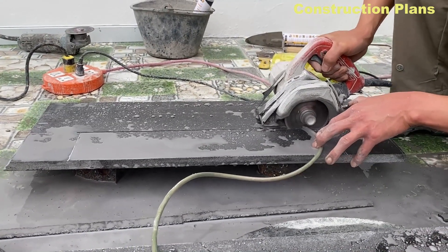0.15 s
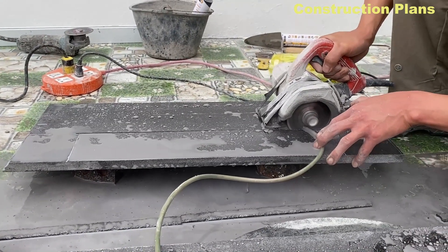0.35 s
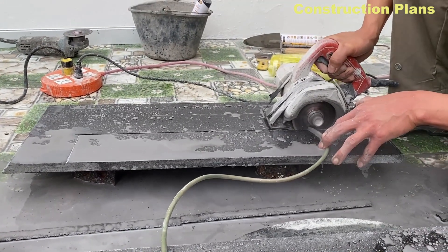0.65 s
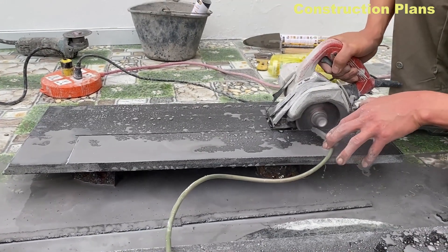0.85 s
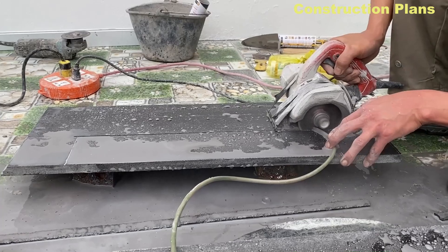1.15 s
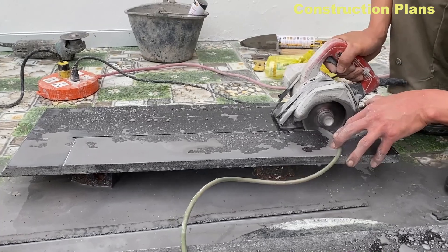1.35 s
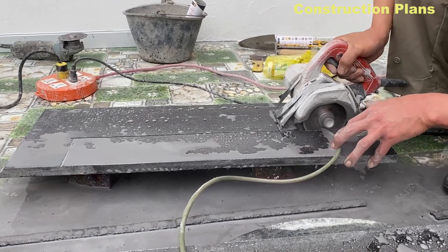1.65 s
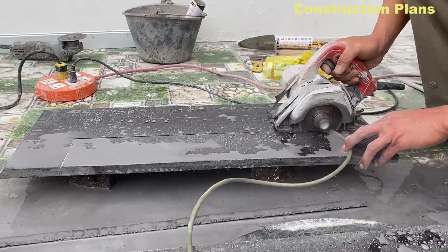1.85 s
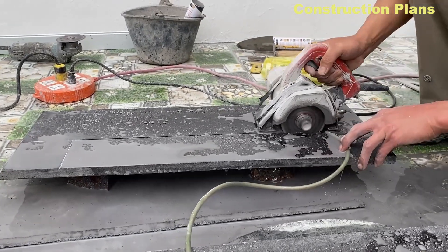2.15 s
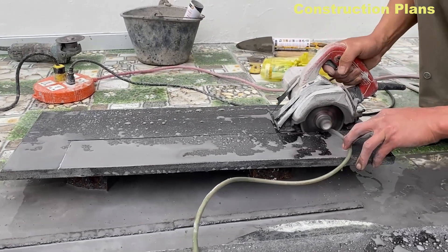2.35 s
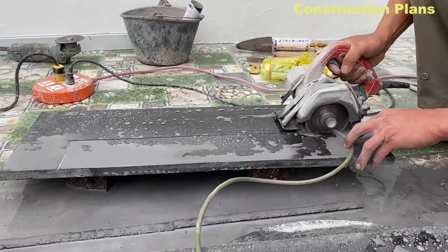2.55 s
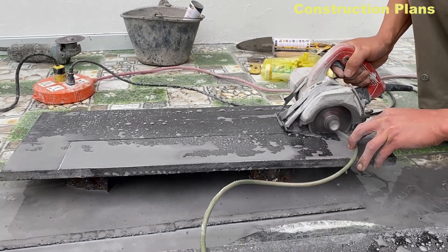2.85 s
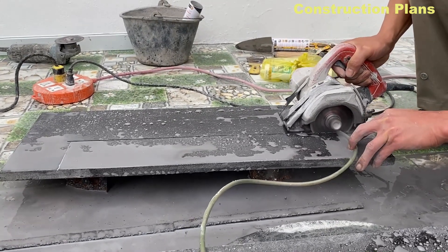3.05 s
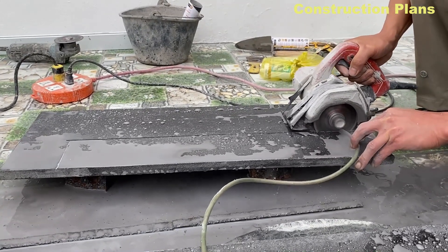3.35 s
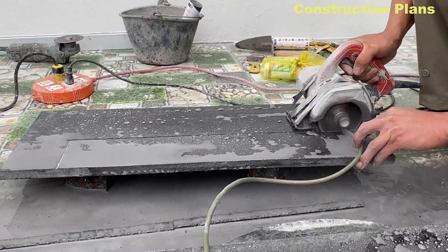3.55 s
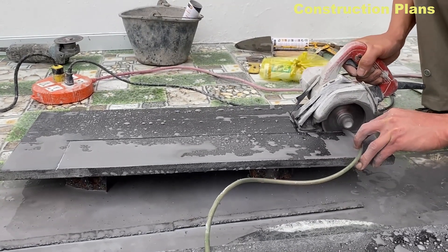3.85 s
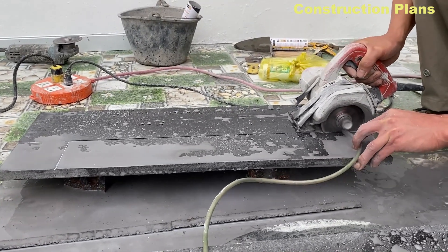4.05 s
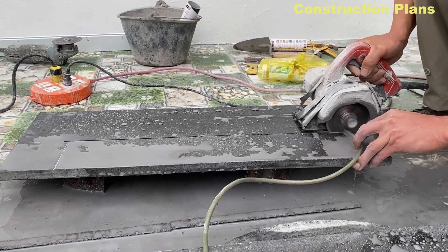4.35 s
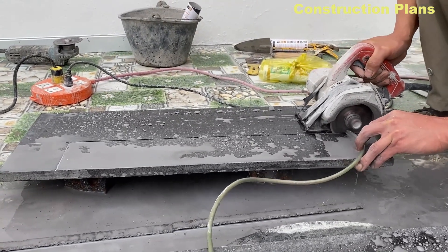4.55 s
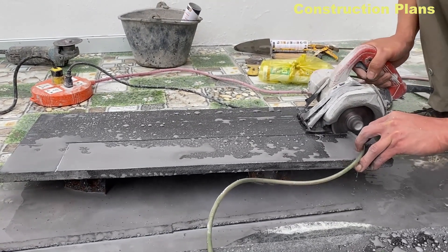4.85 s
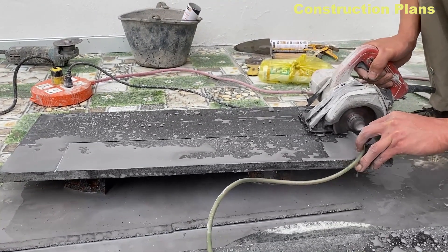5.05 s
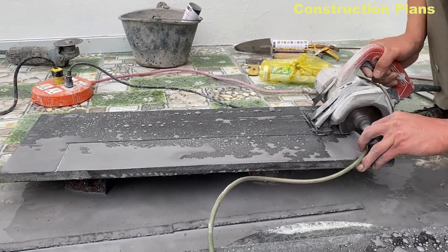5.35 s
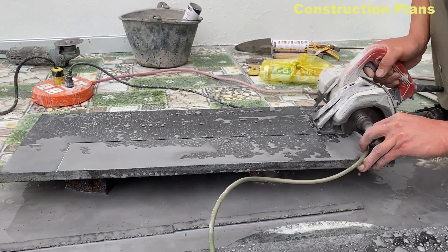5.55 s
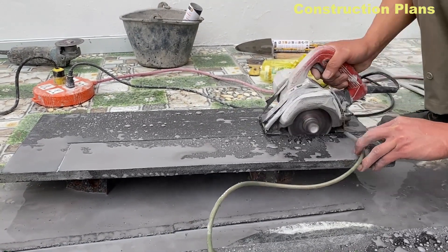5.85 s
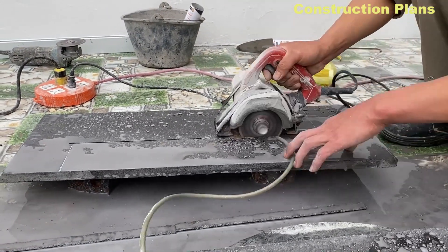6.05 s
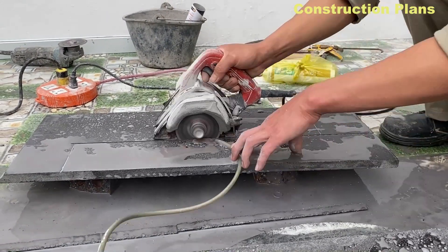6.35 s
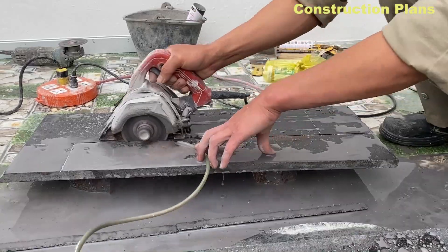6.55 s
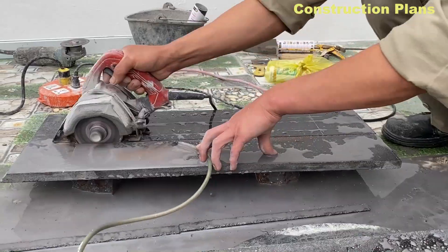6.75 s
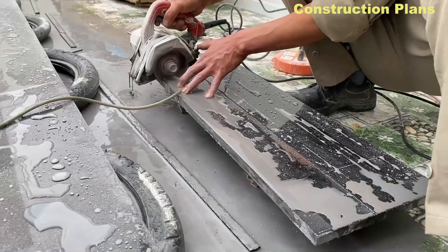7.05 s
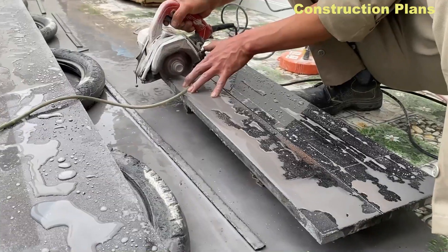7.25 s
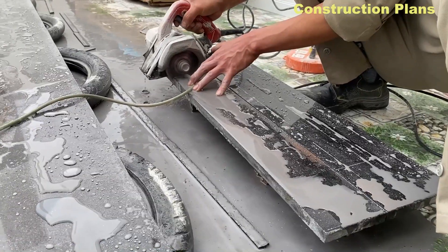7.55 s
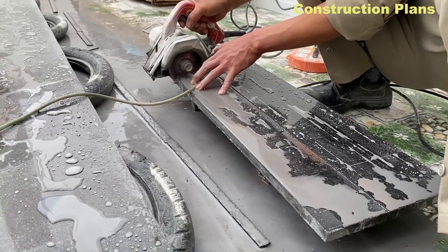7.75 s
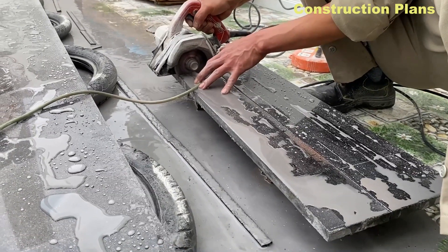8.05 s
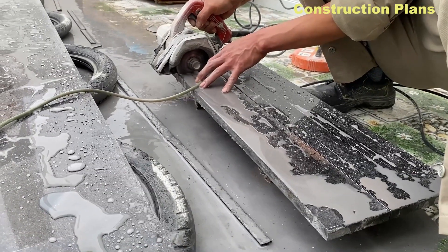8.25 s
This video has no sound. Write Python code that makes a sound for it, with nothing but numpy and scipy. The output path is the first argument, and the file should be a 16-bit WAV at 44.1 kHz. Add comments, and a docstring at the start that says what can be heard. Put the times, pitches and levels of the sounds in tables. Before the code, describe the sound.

A handheld water-fed saw grinds a stone slab very close to a stereo microphone, with little sense of room. From 0 to 2 s there is only a steady, bright, gritty hiss mixed with fine spray, its broad metallic tints wandering. At about 2 s the colour shifts and faint fan draught starts to flutter; from 3 s to 4.5 s it becomes strong, low, ragged puffs, thudding on both sides and brighter on the left. Puffs thin out from 4.5 s, with a heavier one near 4.9 s, while the grind eases to its softest around 5.6 s. At 5.8 s it bites harder and gusts return, strongest from 6.3 to 6.8 s. Around 7.0 s the sound drops away for a few hundredths of a second. A slightly softer, clean hiss resumes, with one barely audible puff near 7.7 s, pressing harder briefly at 8.1 s and continuing to about 8.4 s.

```python
"""At a stone slab, close to the cut: a handheld saw with a wet diamond blade grinds in seven stages.
Cut and position change from stage to stage. Noise in clumps, for the biting grit, is shaped by broad, wandering
blade modes over a bed of spray. In the middle stages the draught of the motor fan buffets the two microphone
ports: short waves of dropping pitch and noise make low puffs. The sound breaks off for a moment near the end."""
import sys
import numpy as np
from scipy import signal
from scipy.fft import rfft, irfft, next_fast_len
from scipy.io import wavfile
from scipy.ndimage import uniform_filter1d

SR = 44100
rng = np.random.default_rng(int(sys.argv[2]) if len(sys.argv) > 2 else 0)


def store_pcm(level_fs):
    """Save levels as 16-bit WAV."""
    pcm = np.round(np.clip(level_fs, -1, 1) * 32767).astype(np.int16)
    wavfile.write(sys.argv[1], SR, np.atleast_2d(pcm).T)


N = 370881
WINDOW, HOP = 1024, 256   # short-time spectrum (samples)
CONTROL_STEP = 20   # spacing of the slow level curves (samples)

# Starts of the seven stages of cut and position: t/s
STAGE_STARTS = [0, 1.96, 3.05, 4.45, 5.75, 7.02, 8.05]
# Spectrum of the brighter wind noise at the left port: f/Hz, level/dB (per Hz)
FLUTTER = [(150, -19), (400, 1.5), (700, -0.5), (1200, -10), (2000, -9.5), (3500, -6.5), (8000, -60)]


def from_db(db):
    """Decibels to gain."""
    return 10 ** (np.asarray(db) / 20)


def rms_one(x):
    """Scale to rms 1."""
    return x / np.sqrt(np.mean(x ** 2) + 1e-20)


def in_time(rows):
    """Columns of a table as curves, one value a sample."""
    s, *columns = np.transpose(rows)
    t = np.arange(N) / SR
    return [np.interp(t, s, column) for column in columns]


def at_hz(spectrum, hz):
    """Read a (f/Hz, level/dB) spectrum on a log frequency axis."""
    table_hz, table_db = np.array(spectrum).T
    return np.interp(np.log(hz), np.log(table_hz), table_db)


def colour(x, spectrum):
    """Shape x by a (f/Hz, level/dB) spectrum."""
    size = next_fast_len(N)
    hz = np.arange(1, size // 2 + 2) * SR / size
    return irfft(rfft(x, size) * from_db(at_hz(spectrum, hz)), size)[..., :N]


def drift(rate_hz, shape, step):
    """Slow chance along the last axis, one value every step samples: double one-pole low-pass; spread 1."""
    run_in = 2000
    r = np.exp(-2 * np.pi * rate_hz * step / SR)
    white = rng.standard_normal((*shape[:-1], shape[-1] + run_in))
    return rms_one(signal.lfilter([1], [1, -2 * r, r * r], white)[..., run_in:])


def lumps(*speeds):
    """A gain that wavers at several (Hz, dB) speeds."""
    size = N // CONTROL_STEP + 1
    level_db = sum(db * drift(hz, (size,), CONTROL_STEP) for hz, db in speeds)
    return np.interp(np.arange(N) / CONTROL_STEP, np.arange(size), from_db(level_db))


def shimmer(shape, width_hz, rate_hz):
    """Narrow patches of the hiss that brighten and fade; spread 1."""
    across = max(round(width_hz * WINDOW / SR), 1)
    field = uniform_filter1d(drift(rate_hz, shape, HOP), across, axis=-2)
    return rms_one(uniform_filter1d(field, across, axis=-2))


def steadied(x, span, share):
    """Take a share of the slow level changes out of x, judged over span steps of the last axis."""
    mean_power = np.mean(np.reshape(x ** 2, (-1, x.shape[-1])), axis=0)
    power = uniform_filter1d(mean_power, span) + 1e-20
    return x / power ** (share / 2)


def gusts():
    """Gusts rise fast, sag on both sides of the peak and die fast; the strongest sets the brightness."""
    # Gusts of the draught: start t/s, peak t/s,
    # end t/s (where the fall starts; if before the start, the gust is faint or unheard),
    # rumble level/dB at the peak, level/dB of the brighter left-port part re rumble
    gust_rows = [(2.04, 2.1, 2.2, -55, -18), (2.21, 2.38, 2.45, -45, -0.5), (2.49, 2.55, 2.59, -47, 3),
                 (2.63, 2.67, 2.74, -42, -3), (2.777, 2.984, 3.04, -33.5, 0), (3.114, 3.44, 3.5, -24, -10),
                 (3.571, 3.773, 4.08, -24.5, -9.5), (4.036, 4.1, 4.14, -31.5, -6.5),
                 (4.17, 4.294, 4.45, -31, -7.5), (4.466, 4.48, 4.575, -36, -11),
                 (4.652, 4.66, 4.7, -35, -12), (4.72, 4.73, 4.74, -40, -12), (4.805, 4.82, 4.84, -33, -8),
                 (4.885, 4.896, 4.93, -25, -15), (5.039, 5.043, 5, -45.5, -1.5),
                 (5.212, 5.225, 5.24, -50, -3), (5.53, 5.54, 4.8, -56, -3),
                 (5.776, 5.82, 5.9, -25.5, -10.5), (5.955, 5.97, 6.02, -34.5, -12),
                 (6.101, 6.105, 6.2, -33.5, -18), (6.235, 6.245, 6.255, -41, -10),
                 (6.3, 6.55, 6.82, -21, -9.5), (6.86, 6.87, 7, -40, -11)]
    lull = (1.97, 0, 7.0, -59.5, -3)   # faint draught between the gusts, same columns; its peak is unused
    sag_rate, rise_rate, fall_rate = 31.5, 500, 405   # off the peak, before the start, after the end (dB/s)
    t = np.arange(0, N, CONTROL_STEP) / SR
    start, peak, end, level_db, bright_db = np.transpose([lull, *gust_rows])[..., None]

    sag_db = sag_rate * np.abs(np.clip(t, start, end) - peak)
    sag_db[0] = 0   # the lull stays level
    rise_db = rise_rate * np.maximum(start - t, 0)
    fall_db = fall_rate * np.maximum(t - end, 0)
    shape_db = level_db - sag_db - rise_db - fall_db

    # gusts come in flurries, at 14 Hz with a spread of 1.3 dB
    flurry_db = 1.3 * drift(14.0, (2, len(t)), CONTROL_STEP)
    rumble_db = shape_db.max(axis=0) + flurry_db[0]
    flutter_db = bright_db[shape_db.argmax(axis=0), 0] + flurry_db[1]
    return in_time(np.transpose([t, rumble_db, flutter_db]))


def sweeps(clicks, start_hz, end_hz, fall_s, decay_s):
    """An eddy passing a port: a short wave of fast-dropping pitch; eight random shapes, dealt per port."""
    # the pitch drops by start_hz towards end_hz, each shape up to 0.475 octave off
    t, out = np.arange(SR // 12) / SR, np.zeros((2, N))
    dealt = rng.integers(0, 8, (2, N))
    for k, (spread, phase) in enumerate(rng.random((8, 2))):
        pitch = (end_hz + start_hz * np.exp(-t / fall_s)) * 2 ** (0.95 * (spread - .5))
        wave = np.sin(2 * np.pi * (np.cumsum(pitch) / SR + phase))
        shape = wave * (1 - np.exp(-t / 0.00055)) * np.exp(-t / decay_s)
        out += signal.oaconvolve(clicks * (dealt == k), shape[None], axes=1)[:, :N]
    return out


def rumble(eddies, gusty):
    """Low wind noise at both ports: slow eddies and gusty noise, duller at the right port."""
    # Spectrum of the rumble: f/Hz, level/dB (per Hz)
    rumble_spectrum = [(20, 6), (40, 5.5), (108, 5), (220, -6.5), (400, -12.5), (550, -12.5), (750, -25.5),
                       (1200, -58)]
    # Further filter at the right port: f/Hz, level/dB
    right_port = [(250, 0.5), (600, -4.5)]
    swept = sweeps(eddies, 464, 65.8, fall_s=0.00382, decay_s=0.009)
    whitened = rms_one(np.diff(swept, prepend=0)) + 1.73 * gusty * rng.standard_normal((2, N))
    low = rms_one(steadied(colour(whitened, rumble_spectrum), SR // 16, share=0.76))
    low[1] = colour(low[1], right_port)
    return low


def flutter(eddies):
    """Brighter wind noise at the left port: quick eddies and short ticks of noise."""
    quick = sweeps(eddies, 1556, 312, fall_s=0.001787, decay_s=0.006)[0]
    ticks = np.convolve(eddies, np.hanning(70), "same") * rng.standard_normal(N)
    mixed = rms_one(np.diff(quick, prepend=0)) + 0.49 * rms_one(ticks)
    return rms_one(steadied(colour(mixed, FLUTTER), SR // 16, share=0.62))


def strong_puffs():
    """Single strong puffs: a thud at both ports, a quick tick and frayed noise at the left."""
    # Puffs: t/s, level/dB driving the thud, level/dB driving the left-port tick and its noise
    puff_rows = [(2.083, -39, -40), (2.269, -39, -33), (2.349, -34, -30), (2.411, -32, -26.5),
                 (2.498, -41, -31), (2.547, -32, -47), (2.647, -36, -34), (2.726, -31, -27.5),
                 (2.788, -34, -22), (2.869, -31, -27), (2.94, -24, -22), (2.999, -24, -34),
                 (3.043, -27, -43), (3.097, -31, -44), (3.139, -25, -38), (3.179, -23, -29),
                 (3.227, -22, -28), (3.275, -22, -33), (3.323, -15.5, -19.5), (3.381, -19, -27),
                 (3.463, -19, -31), (3.578, -21, -27), (3.644, -16, -19.5), (3.662, -18, -28),
                 (3.718, -23, -32), (3.77, -17.5, -22.5), (3.841, -23, -29), (3.887, -16, -28),
                 (3.961, -16, -22), (4.058, -21.5, -24.5), (4.233, -26, -40), (4.326, -24, -36),
                 (4.385, -22, -29), (4.477, -22, -27), (4.655, -27, -36), (4.724, -32, -36),
                 (4.809, -24.5, -33), (4.91, -17, -26), (5.042, -26, -29), (5.214, -36, -48),
                 (5.531, -41, -51), (5.803, -17, -24), (5.88, -16.5, -24), (5.96, -19, -36),
                 (5.997, -21.5, -28), (6.136, -16.5, -24.5), (6.167, -27, -31), (6.245, -29.5, -45),
                 (6.332, -23, -30), (6.457, -18, -29), (6.527, -16.5, -24), (6.642, -18, -23),
                 (6.747, -18.5, -22.5), (6.799, -18.5, -27), (6.867, -23, -40), (6.905, -26, -40),
                 (6.938, -24, -30), (6.965, -25.5, -35), (7.743, -52.5, -42)]
    single = np.zeros((2, N))
    single[:, [round(row[0] * SR) for row in puff_rows]] = from_db(np.array(puff_rows)[:, 1:].T)
    out = sweeps(single[0], 450, 49.5, fall_s=0.00421, decay_s=0.013)
    out[0] += sweeps(single[1], 1205, 347, fall_s=0.0019, decay_s=0.0038)[0]
    # the noise swells from just before each puff
    swell = signal.oaconvolve(single[1], np.hanning(500))[100:N + 100]
    ragged = swell * rng.standard_normal(N)
    out[0] += from_db(7.5) * colour(ragged, FLUTTER)
    return out


def draught():
    """Dense random eddies under the gusts, brighter at the left port, plus the strongest puffs."""
    rumble_db, bright_db = gusts()
    gusty = lumps((40.0, 1.5))
    strength_db = 2.34 * np.minimum(rng.exponential(1, N), 4)
    eddies = gusty * (rng.random(N) < 260 / SR) * from_db(strength_db)   # about 260 a second
    wind = rumble(eddies, gusty)
    wind[0] += from_db(bright_db) * flutter(eddies)
    blowing = np.arange(N) < STAGE_STARTS[5] * SR   # the gusts stop with the sixth stage
    return blowing * from_db(rumble_db) * wind + strong_puffs()


def blade_and_spray(hz, s, stage):
    """Power of spray and blade; each mode swells, fades and slides as the blade is gripped."""
    # Blade modes: f/Hz, width f/Hz, left level/dB in stages 1-7, right level/dB in stages 1-7
    # (before the right-ear balance)
    blade = [(1280, 420, -6.5, -20, -11, -2.5, -23, -8.5, -5.5, -4.5, -20, -5, -2.5, -14.5, -4, -3),
             (2000, 420, -5, -7.5, -6, -4, -21.5, -26, -26, -7, -9, -7, -3, -17, -8, -18),
             (2880, 620, -3.5, -8, -3.5, -18, -2.5, -19, -14, -2, -12, -6, -21, -1.5, -1, -3),
             (3722, 340, 7, 4, 4, 3, 6, -10, 7, 7, 6.5, 5.5, 2.5, 2, 3.5, 9),
             (4180, 120, -4, -8, -12, -7, -12, -12, -3, 5, 1, -10, 0, -9, -14, -2),
             (4550, 184, 2, -5, -1, -10.5, -23, -15, 7, 7.5, 0, -7, -3, -5, -10, -1),
             (4870, 250, 2, -2, 0, -9, 0, 5, 9.5, 0, -1, 0, -2, 6, -4, -1),
             (5160, 216, -4.5, 1.5, -3, 6, 8.5, 10.5, 12.5, 4, 4, 7.5, 8.5, 9.5, 5, 6),
             (5635, 470, 5, 0.5, 5.5, 4, 7.5, 1.5, -1, 7, 3, 4, 2, 5.5, 1, 2),
             (6420, 190, 5, 2, 2, -3, -9, -15, -3, -1, -4, -5, -10, 1, -8, -1),
             (6920, 175, 4.5, -1, 4.5, 4.5, 5.5, -3, 4, -21, 2, 1, -1, 8, -1, 6),
             (7560, 200, -8, -6, -13, -13, -6, -5, 1, 6, -1, -3, 3, 0, 1, 0),
             (8420, 570, -9, -4, -9, -6, -4.5, -9, -19, -8, -0.5, -3.5, -3.5, -1.5, -1.5, -4),
             (9670, 240, -4, -7, -19, -8, -7, -9, -27, 0.5, 1.5, -10, -5, -21, 1.5, -1),
             (10710, 480, -4, -4.5, -4, -7, -15, -9, -5, -3.5, -1, -1, -3, -3, -5, -2),
             (11900, 230, -14.5, -10, -20, -5, -12, -8, -10, -2, -10, -3, -1, -5, -2, -3),
             (13220, 240, -2, -12, -8, -9, -15, -6, -9, -2, 1, -2, -3, -16, 3, -2),
             (14860, 250, -5, -2, -3, -1, -17, -7, -14, 1.5, 0.5, 0, 2, -0.5, -2, -6)]
    # Spectrum of the spray noise: f/Hz, level/dB (per Hz)
    spray = [(30, -52), (110, -27), (420, -17.5), (1300, -7.5), (2100, -10), (3000, -3), (4000, -0.5),
             (5300, -5.5), (6800, 0), (8100, -5.5), (9100, -9), (12500, -9), (15700, -9.5)]
    # Spray re modes, one value a stage: level/dB
    spray_by_stage = [-0.7, 0, -0.37, 0.12, -0.61, 0.25, -1.5]
    spray_db = at_hz(spray, hz + 1)[:, None] + np.array(spray_by_stage)[stage]
    power = from_db(2 * spray_db) * np.ones((2, 1, 1))   # twice the dB: power, not amplitude

    shape = (len(blade), len(s))
    swell_db = 1.0 * drift(1.65, shape, HOP) + 0.89 * drift(10.3, shape, HOP)
    slide_hz = 60 * drift(0.7, shape, HOP)
    for k, (mode_hz, width_hz, *level_db) in enumerate(blade):
        near = np.abs(hz - mode_hz) < 1500
        offset = 2 * (hz[near, None] - mode_hz - slide_hz[k]) / width_hz
        peak = 1 / (1 + offset ** 2) ** 1.08   # steep skirts leave dark valleys
        mode_db = np.reshape(level_db, (2, -1))[:, None, stage] + swell_db[k]
        power[:, near] += peak * from_db(2 * mode_db)
    return power


def grind():
    """Grit bites in clumps that both ears share, hissing through the blade modes and spray."""
    # Depth of the cut, as level of the grind below 8 kHz: t/s, level/dB
    cut = [(0.0, -32), (0.96, -32.5), (1.24, -34.5), (1.59, -33), (1.91, -36.5), (1.97, -32), (2.32, -35),
           (2.71, -31.5), (3.12, -36), (3.21, -32), (3.6, -33.5), (4.03, -32.5), (4.19, -34.5),
           (4.4, -32.5), (4.5, -35), (5.5, -36.5), (5.6, -39.5), (5.74, -38), (5.81, -31), (6.04, -34.5),
           (6.14, -30.5), (6.29, -32.5), (6.5, -29.5), (6.99, -33.5), (7.05, -37), (7.84, -35.5),
           (8.08, -37.5), (8.13, -32.5), (8.41, -35.5)]
    # Balance added to the right ear, one value a stage: level/dB
    right_by_stage = [-1.5, -2.5, -1.5, -2.0, -1.5, -3.5, -3.5]
    # Treble at the stage's mean depth, one value a stage: level/dB
    treble_by_stage = [-37, -36.5, -37.5, -40, -36.5, -37.5, -38]
    bite = lumps((20.0, .3), (90.0, 1.0))
    hz, s, grit = signal.stft(bite * rng.standard_normal((2, N)), SR, nperseg=WINDOW, noverlap=WINDOW - HOP)
    stage = np.searchsorted(STAGE_STARTS, s, side="right") - 1
    power = blade_and_spray(hz, s, stage)

    # most patches are common to both ears, the second set is each ear's own
    patches_db = 2.1 * shimmer(power.shape[1:], 130, 9.4) + 0.81 * shimmer(power.shape, 130, 7.8)
    patches_db += 0.87 * shimmer(power.shape[1:], 700, 14.5)
    gain = np.sqrt(power) * from_db(patches_db)
    gain[1] *= from_db(right_by_stage)[stage]

    # the hand's pressure wavers, at 4 Hz with a spread of 0.3 dB
    grind_db = np.interp(s, *np.transpose(cut)) + 0.3 * drift(4.0, s.shape, HOP)
    mean_db = np.bincount(stage, grind_db) / np.bincount(stage)
    # the treble follows only a share of the grind's swing
    treble_db = np.array(treble_by_stage)[stage] + 0.53 * (grind_db - mean_db[stage])
    treble_hz = 8000
    for band, band_db in ((hz < treble_hz, grind_db), (hz >= treble_hz, treble_db)):
        # the modes trade strength among themselves; the band as a whole follows the cut
        even = steadied(gain[:, band], 16, share=0.99) * np.sqrt(len(hz) / band.sum())
        gain[:, band] = even * from_db(band_db)
    return signal.istft(grit * gain, SR, nperseg=WINDOW, noverlap=WINDOW - HOP)[1][:, :N]


def scene():
    """Saw and draught with the short break; then the microphone is out of the draught, bar one faint puff."""
    # The sound breaks off: t/s, level/dB
    break_rows = [(6.999, -1.5), (7.009, -20), (7.027, -19), (7.0295, -1), (7.04, 0)]
    # the hiss carries no deep bass
    low_cut = signal.butter(2, 65, "high", fs=SR, output="sos")
    hiss = signal.sosfilt(low_cut, grind())
    return from_db(in_time(break_rows)[0]) * (hiss + draught())


def record(dry):
    """The top is cut steeply, by an elliptic low-pass at 15950 Hz."""
    top_cut = signal.ellip(12, .3, 80, 15950, fs=SR, output="sos")
    return signal.sosfilt(top_cut, dry)


dry = scene()
out = record(dry)
store_pcm(out)
```